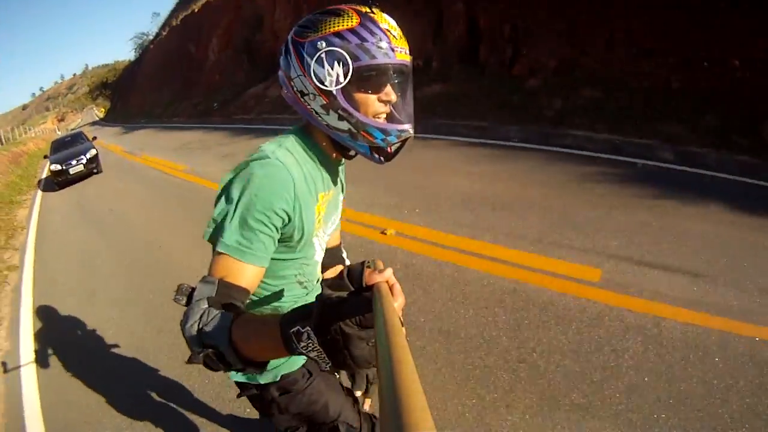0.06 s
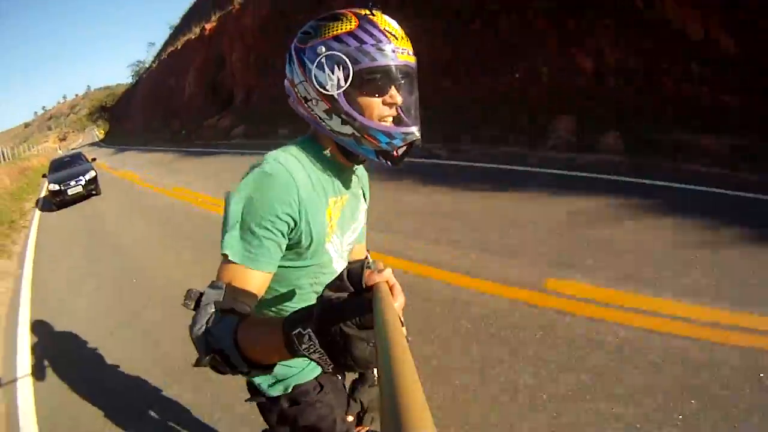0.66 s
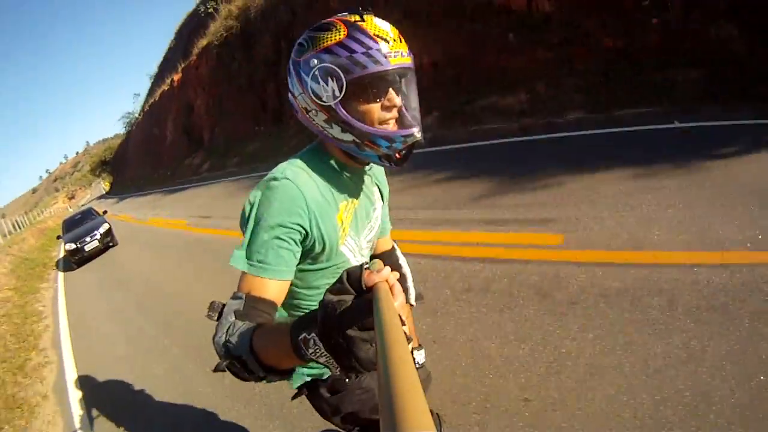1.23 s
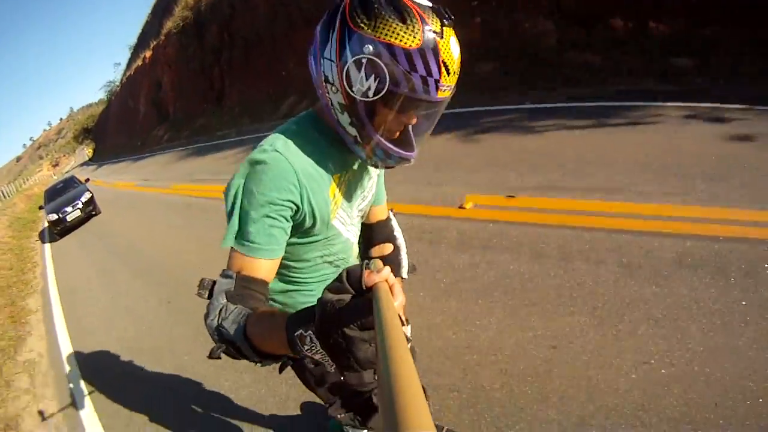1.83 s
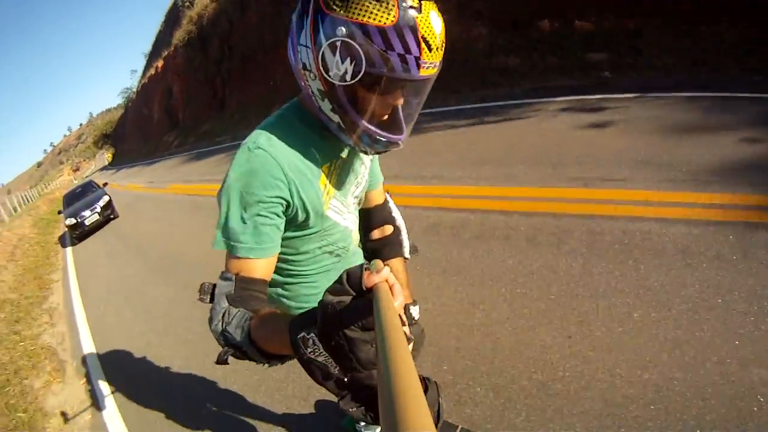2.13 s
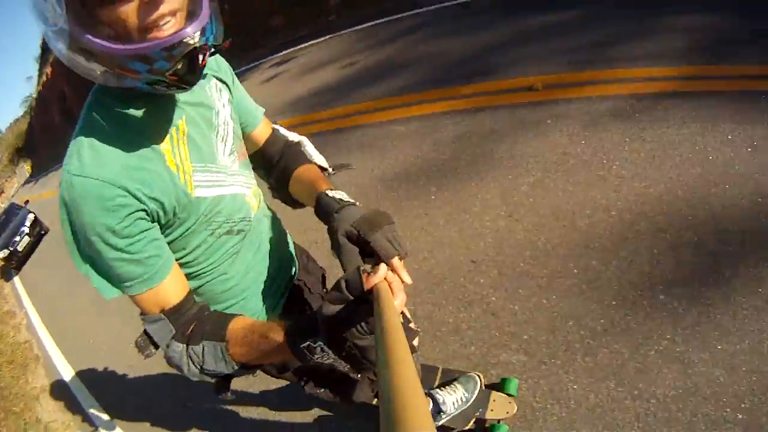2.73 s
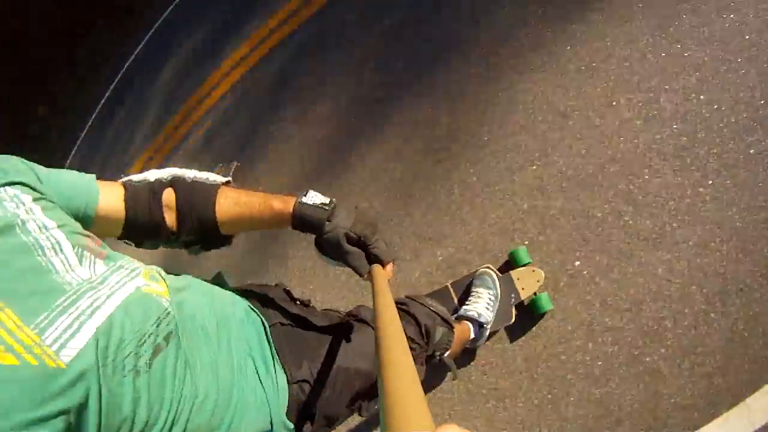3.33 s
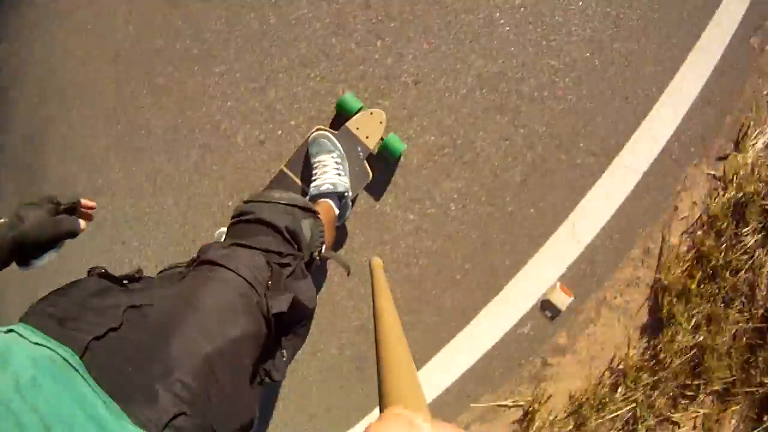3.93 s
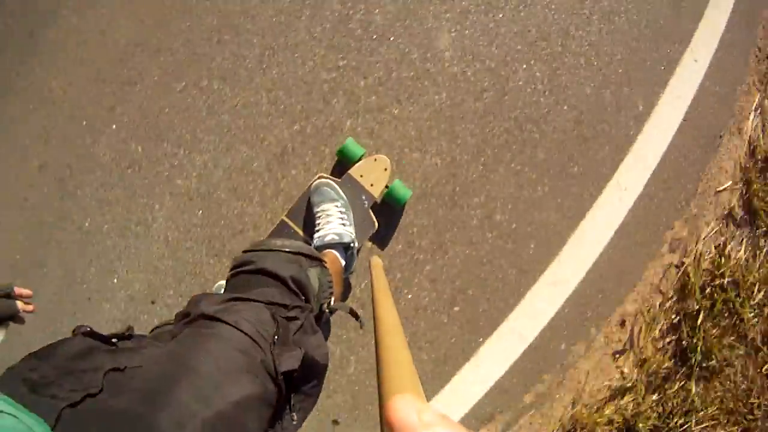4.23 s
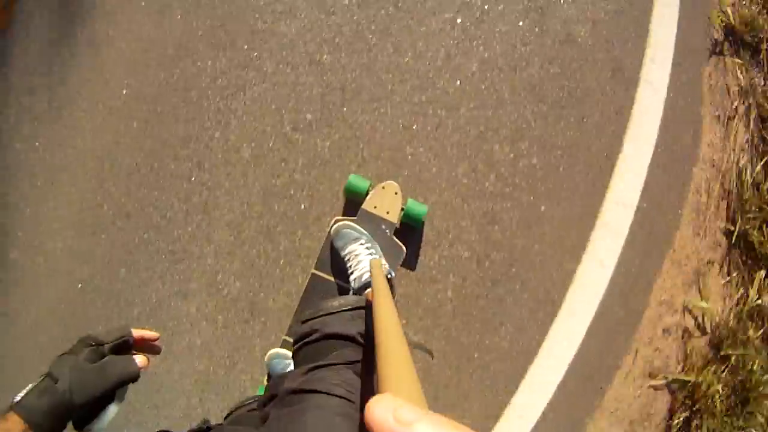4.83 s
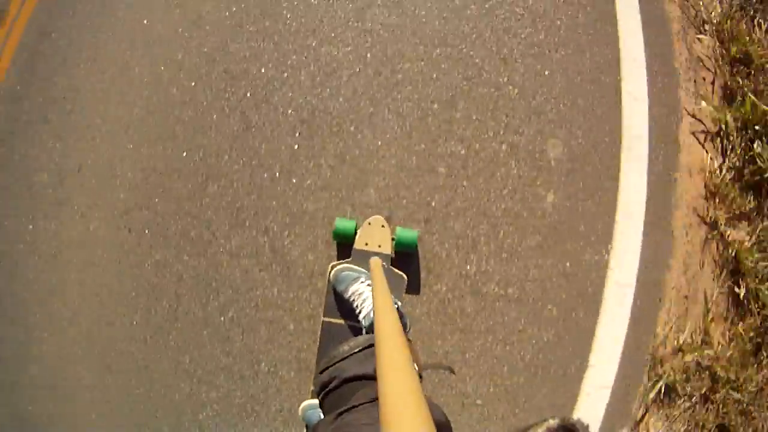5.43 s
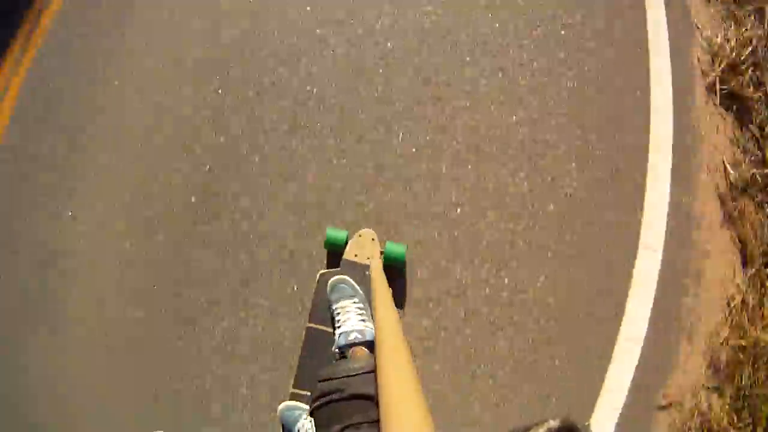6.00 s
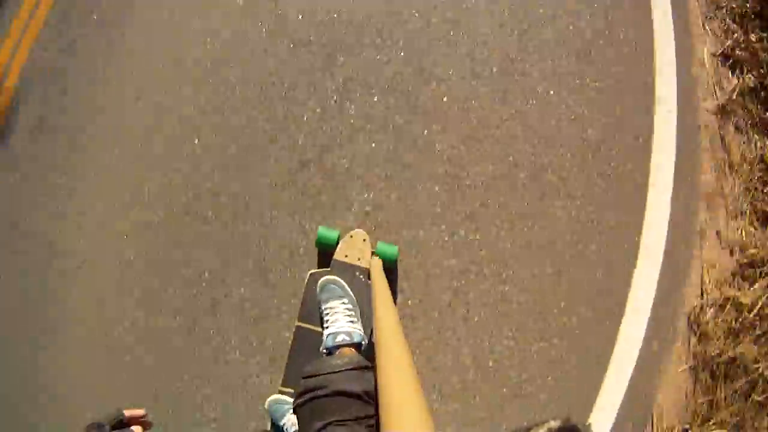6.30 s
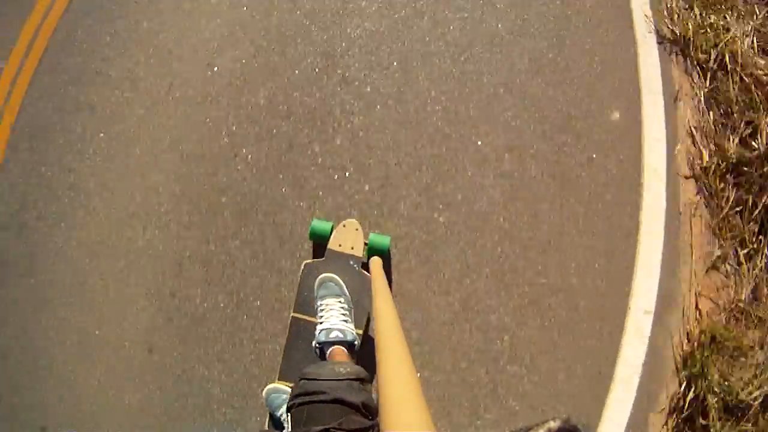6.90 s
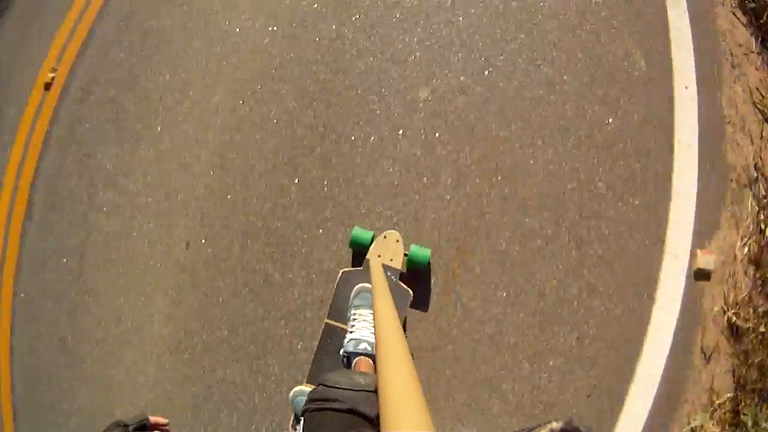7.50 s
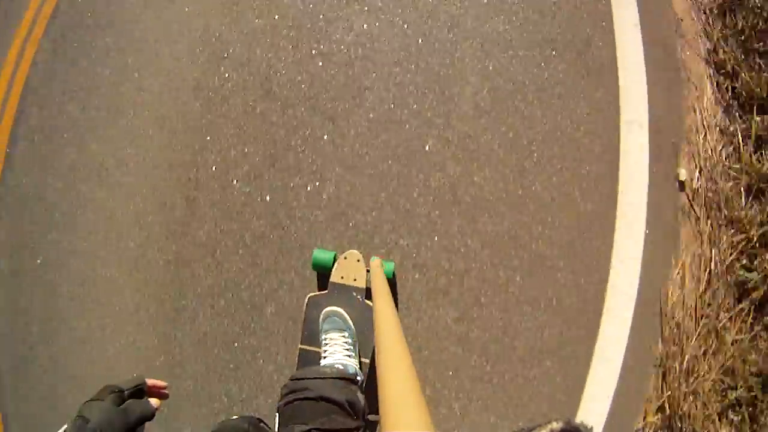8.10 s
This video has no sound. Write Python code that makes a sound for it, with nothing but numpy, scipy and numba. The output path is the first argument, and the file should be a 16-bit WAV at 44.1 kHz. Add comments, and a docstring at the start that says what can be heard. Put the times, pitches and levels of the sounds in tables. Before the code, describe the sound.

A longboard rolls fast on an asphalt road, heard from a cased camera on a hand-held pole. From the start the wheels make a gritty, fluttering roar while low wind buffets the microphone. Faint wheel chirps come at about 1 and 1.6 seconds. At 2.5 seconds close handling noise begins: hands rub along the pole, and hard knocks near 2.6, 2.9 and 3.1 seconds stand out, overloading the microphone. A short falling rasp of a sliding hand follows at 3.2 seconds, then a deep thump at 3.5. Lighter rubs, taps and wind gusts continue until about 5.3 seconds, with another low thump near 5.1. The rolling is now duller, with small road bumps coming through the pole. A gust and very faint wheel scuffs pass around 7 seconds, and wheels and wind ease gradually until the end at about 8 seconds.

```python
"""On an asphalt road, a longboard rolls fast, heard from a cased camera on a hand-held pole.
The wheels roar over the stones and chirp as they scuff; wind buffets the case. The rider swings the
pole round to point at the board: hands rub along it, shove it and knock it hard enough to overload
the microphone. The ride goes on, duller, with road bumps coming up through the arm, and wheels and
wind fade as the board slows a little."""
import sys
import numpy as np
from scipy import signal
from scipy.fft import rfft, irfft
from scipy.io import wavfile
from numba import njit

SR = 44100
rng = np.random.default_rng(int(sys.argv[2]) if len(sys.argv) > 2 else 0)


def dump(signal):
    """Clip the signal to [-1, 1] and save it as 16-bit WAV at the path in sys.argv[1]."""
    limited = np.clip(np.atleast_2d(signal).T, -1, 1)
    pcm = np.round(limited * 32767).astype(np.int16)
    wavfile.write(sys.argv[1], SR, pcm)


N = 359415
TIME = np.arange(N) / SR
BIN_HZ = np.arange(N // 2 + 1) * SR / N

# Broad tone of rubbing carried by the pole. Each row: frequency in Hz, level in dB.
RUB_TONE = [(60, -15.5), (160, 7.5), (260, -9.5), (450, 3.5), (1500, -5.5), (2400, -5), (2800, -20.5),
            (4900, -24), (5500, -33), (6600, -36.5), (7200, -35), (10500, -16), (14500, -23),
            (15300, -33.5)]
# Resonances and dips of the pole. Each row: centre in Hz, width in Hz, gain in dB.
POLE_RESONANCES = [(450, 170, -1.5), (802, 95, 7.5), (1085, 87, -2.5), (1200, 150, 5), (1980, 320, 6),
                   (2460, 130, 3), (2936, 220, 8.5), (3170, 212, -4), (3496, 370, 10.5), (4670, 470, 5),
                   (7270, 420, 15), (8450, 300, 11), (9900, 630, 7.5), (12060, 670, -12),
                   (13400, 3300, 3.5), (14250, 700, 4.5)]


def undb(db):
    """Decibels to gain."""
    return 10 ** (np.asarray(db) / 20)


def unit(x):
    """Scale to rms 1."""
    return x / np.sqrt(np.mean(x ** 2))


def curve(rows):
    """Join (seconds, value) rows by straight lines."""
    return np.interp(TIME, *np.transpose(rows))


def fader(rows):
    """Gain envelope through (seconds, dB) rows, silent before and after them."""
    times, db = np.transpose(rows)
    return np.interp(TIME, times, undb(db), left=0, right=0)


def swell(peak, rise, fall):
    """Smooth rise to 1 and fall back, times in seconds."""
    return np.exp(-np.minimum(((TIME - peak) / np.where(TIME < peak, rise, fall)) ** 2, 20))


def wander(hz):
    """Random drift of rms 1, moving at rates up to about `hz`."""
    return unit(irfft(rfft(rng.standard_normal(N)) * np.exp(-(BIN_HZ / hz) ** 2), N))


def butter(order, hz, kind="lowpass"):
    """Butterworth filter sections."""
    return signal.butter(order, hz, kind, fs=SR, output="sos")


def colour(x, tone, resonances=()):
    """Causal EQ: a broad (Hz, dB) tone curve plus (Hz, width, dB) resonances."""
    hz, db = np.transpose(tone)
    db = np.interp(np.log(BIN_HZ + 1), np.log(hz), db)
    beyond_ends = np.maximum(BIN_HZ / hz[-1], 1) * np.maximum(hz[0] / (BIN_HZ + 1), 1)
    db = db - 40 * np.log10(beyond_ends)  # 12 dB per octave
    for centre, width, lift in resonances:
        db = db + lift / (1 + (2 * (BIN_HZ - centre) / width) ** 4)
    # minimum phase, so nothing rings ahead of a hit
    cepstrum = irfft(np.log(undb(db)), N)
    cepstrum[1:N // 2] *= 2
    cepstrum[N // 2:] = 0
    return irfft(rfft(x, N) * np.exp(rfft(cepstrum)), N)


def grains(per_s, spread_db):
    """Tiny impacts of unequal size at random moments."""
    hit = rng.random(N) < per_s / SR
    return unit(hit * rng.standard_normal(N) * undb(spread_db * np.minimum(rng.exponential(size=N), 4)))


def add(track, start, sound):
    """Mix a short sound in at a time in seconds."""
    i = int(start * SR)
    track[i:i + len(sound)] += sound[:N - i]


def ring(t, hz, t60):
    """One struck mode, dying by 60 dB in t60 seconds."""
    return np.sin(2 * np.pi * hz * t) * np.exp(-np.log(1000) * t / t60)


def rasp(hz, width_hz):
    """Rough stick-slip tone: a pitch whose amplitude and phase wander."""
    phase = 2 * np.pi * np.cumsum(hz) / SR
    return unit(wander(width_hz) * np.cos(phase) + wander(width_hz) * np.sin(phase))


def crossfade(held_out, pointing_down, down):
    """Equal-power blend between the two pole positions."""
    return np.sqrt(1 - down) * held_out + np.sqrt(down) * pointing_down


def wheels(down, fade_db_per_s=0.98):
    """Wheels strike the stones of the asphalt; patches of road make the roar swell and flutter."""
    # Tone of the roar, pole held out and pointing down. Each row: frequency in Hz, level in dB.
    out_tone = [(100, 6), (180, 8), (240, -2.5), (420, 2), (600, -1.5), (950, -0.5), (1180, -7.5),
                (1450, -0.5), (2400, -2), (2950, -0.5), (4000, -17.5), (8000, -22), (9400, -14),
                (11500, -24.5), (15000, -21)]
    down_tone = [(100, 5.5), (210, -11.5), (330, 4), (460, -1), (530, -7.5), (900, -5.5), (1200, -19),
                 (1800, -14.5), (2400, -17.5), (3500, -21), (4100, -26.5), (9600, -30.5), (11000, -29.5),
                 (15000, -32.5)]
    # Air resonances of the case, and ringing that stands out with the camera aimed at the wheels.
    # Each row: centre in Hz, width in Hz, boost in dB.
    case_air = [(430.4, 38, 6), (845, 76, 4.5), (2068, 100, 5), (3590, 240, 3), (4600, 200, 2.5),
                (6060, 660, 2), (8840, 790, 4), (9690, 800, 4), (14500, 1030, 7)]
    wheel_ring = [(2350, 270, 11), (10060, 370, 5.5), (14350, 820, -0.5)]
    grit = grains(per_s=14000, spread_db=-2.5) * undb(0.5 * wander(1.4) + 0.58 * wander(45))
    held_out = unit(colour(grit, out_tone, case_air))
    coarse_grit = grains(per_s=6300, spread_db=2.4)
    pointing_down = unit(colour(coarse_grit, down_tone, case_air + wheel_ring))
    pointing_down *= undb(0.26 * wander(3.0) + 1.1 * wander(39.4))
    dip_db = -27 * swell(peak=2.765, rise=0.017, fall=0.017)  # the roar drops out for an instant
    return crossfade(held_out, pointing_down, down) * undb(-43 - fade_db_per_s * TIME + dip_db)


def wind(down, fade_db_per_s=1.44):
    """Eddies shed by the case thud on the microphone, slower once it points down."""
    # Tone of the buffeting, pole held out and pointing down. Each row: frequency in Hz, level in dB.
    out_tone = [(10, -9), (22, -56.5), (40, -3.5), (66, -1), (82, -7.5), (105, -28.5), (250, -35.5)]
    down_tone = [(10, -6), (22, 3), (34, 2), (48, -1), (70, -8), (120, -20.5), (250, -22.5)]
    # The strongest gusts. Each row: peak time in seconds, half length in seconds, boost in dB.
    gusts = [(0.907, 0.053, 6), (3.377, 0.11, 7), (4.037, 0.12, 8.5), (4.677, 0.037, 9.5),
             (5.296, 0.039, 7), (7.05, 0.09, 6.5)]
    held_out = unit(colour(rng.standard_normal(N), out_tone)) * undb(-3.5)
    pointing_down = unit(colour(rng.standard_normal(N), down_tone))
    gust_db = 1.5 * wander(3.3) + sum(db * swell(peak, half, half) for peak, half, db in gusts)
    return crossfade(held_out, pointing_down, down) * undb(-30.5 - fade_db_per_s * TIME + gust_db)


def knocks(padding_hz=1900, lead_cycles=1.272, lead_s=0.001018):
    """Each knock rings the mount briefly and sends a tick up the pole; the padded hand dulls the blow."""
    # Blows on the pole. Each row: start in seconds, relative body level in dB, body pitch in Hz,
    # relative tick level in dB.
    blows = [(2.524, -47, 468, -26.5), (2.631, 18.5, 630, 5), (2.721, -12.5, 554, -37),
             (2.93, -20, 686, -39), (2.9452, 9.5, 420, 2), (3.1284, 15, 488, -7), (3.191, -5.5, 580, -24.5),
             (3.414, -28, 630, -20), (3.439, -20, 490, -29), (3.4848, -8, 426, -19.5),
             (3.673, -14, 398, -39), (3.981, -30, 600, -23), (4.0863, -16, 630, -29),
             (4.354, -26, 840, -26), (4.473, -25, 600, -37), (4.507, -17.5, 580, -29),
             (4.653, -28, 590, -35), (5.213, -26, 600, -38)]
    # Modes of the camera mount. Each row: ratio to the body pitch, gain in dB, t60 in seconds.
    mount_modes = [(0.292, -23.5, .04), (0.738, -2.5, 0.01), (1.003, 7.5, 0.012), (1.2, -15.5, 0.0075),
                   (2.6, -13.5, 0.012)]
    t = TIME[:SR // 8]
    bodies, ticks = np.zeros(N), np.zeros(N)
    for start, body_db, hz, tick_db in blows:
        sharpness = np.clip(undb(tick_db - body_db + 15.5), 0, 1) ** 2
        # short bending waves run ahead in the pole, so a sharp blow starts high and drops to its pitch
        early = t + sharpness * lead_cycles / hz * np.minimum(t / lead_s, 1)
        body = sum(undb(db) * ring(early, hz * ratio, t60) for ratio, db, t60 in mount_modes)
        attack_s = 0.00065 + 0.001 * (1 - sharpness)
        add(bodies, start, undb(body_db) * body * (1 - np.exp(-t / attack_s)))
        chatter = rng.standard_normal(len(t)) * np.exp(-t / 0.0027)
        add(ticks, start, undb(tick_db) * chatter / np.linalg.norm(chatter))
    bodies = signal.sosfilt(butter(2, padding_hz), bodies)
    return undb(4.5) * bodies + undb(29) * colour(ticks, RUB_TONE, POLE_RESONANCES)


def hands(firm_db=-28.5, rumble_hz=65.5):
    """Glove and palm stick and slip along the pole; their force drives body, scrape, swish and rumble."""
    # Hand strokes. Each row: peak time, rise and fall in seconds, force in dB.
    strokes = [(2.528, 0.011, 0.0055, -36), (2.69, 0.045, 0.089, -39), (2.828, 0.029, 0.072, -30),
               (2.927, .013, 0.022, -23), (3.002, 0.041, 0.023, -24.5), (3.11, 0.053, .04, -34),
               (3.184, 0.066, 0.037, -18), (3.207, 0.0097, 0.0068, -14), (3.244, 0.029, 0.027, -24),
               (3.32, 0.11, 0.054, -38.5), (3.49, 0.049, 0.04, -29), (3.81, 0.041, 0.033, -35),
               (3.928, 0.047, .024, -25.5), (4.018, 0.033, 0.016, -25), (4.109, .028, 0.016, -42),
               (4.2, 0.0064, .022, -40), (4.525, .028, 0.046, -35.5), (4.615, .02, 0.0092, -42),
               (4.711, 0.05, .011, -38), (4.89, 0.036, 0.032, -35.5), (4.989, 0.04, 0.064, -41.5),
               (5.093, 0.003, 0.0065, -19.5), (5.19, 0.033, 0.06, -44), (5.305, 0.04, 0.0065, -46.5)]
    # The glove's bright skim before it takes hold. Each row: time in seconds, level in dB.
    skim_levels = [(3.0, -66), (3.05, -44), (3.09, -34.5), (3.125, -32), (3.17, -53.5), (3.25, -70)]
    force = np.sqrt(sum((undb(db) * swell(peak, rise, fall)) ** 2 for peak, rise, fall, db in strokes))
    firmness = force / undb(firm_db)
    slips = grains(per_s=4500, spread_db=2.0) * undb(1.26 * wander(90))
    # the echo from the pole's end shifts as the hand travels
    echo_s = 0.0022 * np.exp(0.1315 * wander(4.28))
    echo = 0.29 * np.interp(TIME - echo_s, TIME, slips)
    rub = unit(colour(slips + echo, RUB_TONE, POLE_RESONANCES))
    lows = signal.sosfiltfilt(butter(2, 1300), rub)
    lows_and_mids = signal.sosfiltfilt(butter(2, 2900), rub)
    body = lows * force / firmness ** 0.154  # a light stroke has relatively more body than a firm one
    scrape = (lows_and_mids - lows) * force
    swish = (rub - lows_and_mids) * force * undb(-2)
    skim = unit(signal.sosfilt(butter(3, (3000, 8944), "bandpass"), rub)) * fader(skim_levels)
    rumble = unit(signal.sosfilt(butter(4, rumble_hz), rng.standard_normal(N)))
    rumble *= undb(-32) * np.sqrt(np.minimum(firmness, 1))
    return body + scrape + swish + skim + rumble


def hard_slide():
    """One hard slide of the hand sticks and slips in a falling rasp."""
    # Path of the rasp. Each row: time in seconds, pitch in Hz, level in dB.
    glide = [(3.13, 2012, -60), (3.16, 1750, -26), (3.185, 1431, -24), (3.208, 1234, -27),
             (3.235, 1060, -53), (3.27, 900, -62)]
    pitch = curve([(s, hz) for s, hz, _ in glide])
    return rasp(pitch, width_hz=68) * fader([(s, db) for s, _, db in glide])


def jolts(down, bend_hz=94.8, bend_t60_s=0.25, bumps_per_s=4.9, bump_s=0.0097):
    """Each jolt pushes the case out and back and sets the pole bending; the road keeps it trembling."""
    # Low thumps in the pole: hand shoves, then road bumps coming up through the arm. Each row: start
    # in seconds, thump level in dB, thump length in seconds, level of the bending ring in dB.
    low_thumps = [(2.534, -30, 0.0088, -26), (2.817, -19, 0.022, -27), (2.927, -16.5, 0.0062, -17),
                  (2.944, 2.5, 0.0073, -14), (3.128, -16, 0.01, -15), (3.488, -12, 0.026, -4),
                  (3.676, -14.5, 0.0062, -28), (4.098, -21.5, 0.0075, -26), (4.361, -21.5, 0.022, -27.5),
                  (5.044, -18.5, 0.035, -49), (5.0912, -3, .012, -10.5), (6.091, -32, 0.0075, -34.5),
                  (6.866, -33, 0.0062, -40), (7.891, -46.5, 0.027, -29.5)]
    t = TIME[:SR // 2]
    bend = ring(t, bend_hz, bend_t60_s)
    tremble = unit(signal.fftconvolve(rng.standard_normal(N), bend)[:N])
    # small road bumps arrive at random once the pole points down
    gaps, softness = rng.random(size=(40, 2)).T
    starts = np.cumsum(2 * gaps / bumps_per_s)
    small_bumps = [(start, db, bump_s, db + 1) for start, db in zip(starts, -38 - 10 * softness)
                   if start < TIME[-1] and down[int(start * SR)] > 0.5]
    thumps = np.zeros(N)
    for start, thump_db, length, ring_db in low_thumps + small_bumps:
        travel = 1.3 * np.pi * (t / length - 0.5)
        out_and_back = -travel * np.exp((1 - travel ** 2) / 2)
        attack = np.minimum(4 * t / length, 1)
        add(thumps, start, undb(thump_db) * out_and_back * attack + undb(ring_db) * bend)
    return thumps + undb(-58.5) * tremble


def scuffs():
    """A wheel chirps briefly, over a broad scrape, as it loses grip."""
    # Sideways slips. Each row: peak time and half length in seconds, pitch in Hz, relative level in dB.
    skids = [(1.02, 0.012, 2064, -45.5), (1.11, 0.013, 2150, -51), (1.585, 0.017, 1990, -46.5),
             (7.025, .018, 2290, -56.5), (7.25, 0.014, 1900, -55)]
    pitch = curve([(peak, hz) for peak, _, hz, _ in skids])
    level = sum(undb(db) * np.exp(-((TIME - peak) / half) ** 2) for peak, half, _, db in skids)
    grit = grains(per_s=4600, spread_db=11.0)
    scrape = unit(signal.sosfilt(butter(2, (600, 2300), "bandpass"), grit))
    chirp = rasp(pitch, width_hz=220)
    return level * (undb(1) * chirp + undb(-2) * scrape)


def scene():
    """Road, wind and handling noise meet at the one microphone."""
    # Swing of the pole. Each row: time in seconds, position from 0 (held out) to 1 (pointing down).
    swing = [(0, 0), (2.35, 0.15), (2.9, 0.78), (4.1, 0.87), (5.2, 0.99), (8.15, 0.82)]
    down = np.clip(curve(swing), 0, 1)
    mix = wheels(down) + scuffs() + wind(down) + hands() + hard_slide() + knocks() + jolts(down)
    return mix[None]


@njit
def follow(x, attack, release):
    """Level follower with separate rise and fall."""
    out, level = np.empty(len(x)), 0.
    for i in range(len(x)):
        level += (x[i] - level) * (attack if x[i] > level else release)
        out[i] = level
    return out


def record(dry, attack_s=0.0066, release_s=0.12, threshold_db=-11, image_db=-38, top_hz=15200):
    """Hard knocks clip, gain control ducks briefly after them, and the top is cut."""
    level = follow(np.minimum(np.abs(dry[0]), 1), 1 / (attack_s * SR), 1 / (release_s * SR))
    gain = np.minimum(1, undb(threshold_db) / (level + 1e-9))
    clipped = np.clip(dry * gain, -1, 1)
    # a filter after the clipping cuts a narrow band at 6 kHz
    notched = signal.lfilter(*signal.iirnotch(6000, Q=5.5, fs=SR), clipped)
    # the converter mirrors a faint image of the lows into the treble
    mirrored = notched * (1 + undb(image_db) * np.cos(2 * np.pi * 12000 * TIME))
    return signal.sosfilt(signal.ellip(10, 0.2, 70, top_hz, fs=SR, output="sos"), mirrored)


dry = scene()
out = record(dry)
dump(out)
```